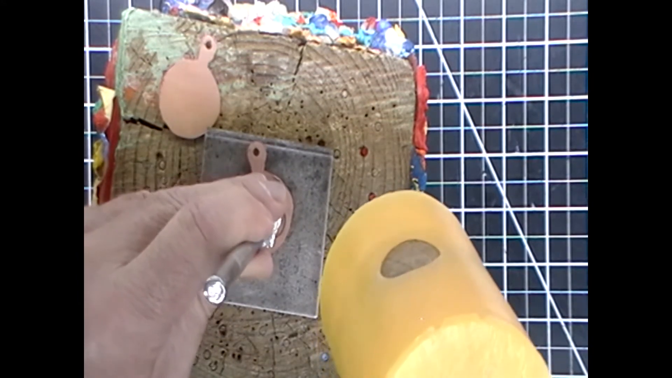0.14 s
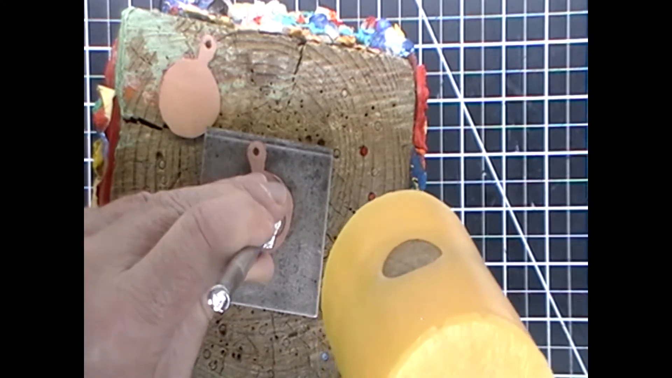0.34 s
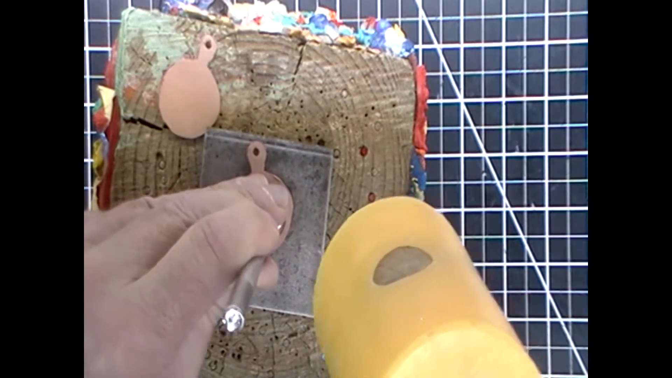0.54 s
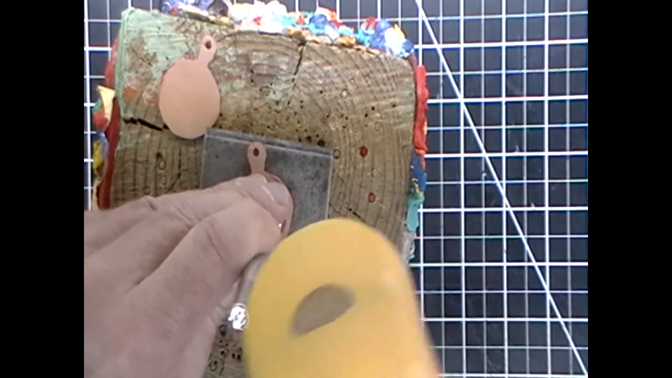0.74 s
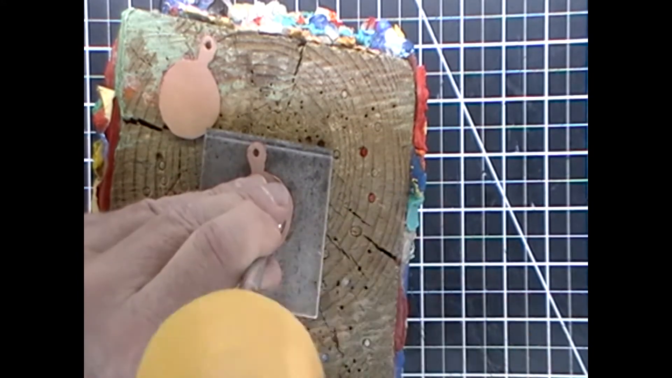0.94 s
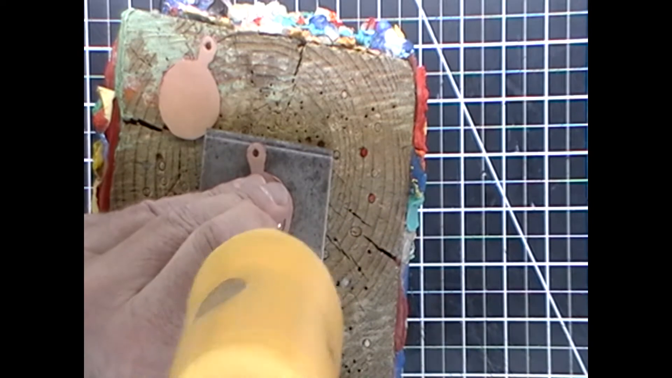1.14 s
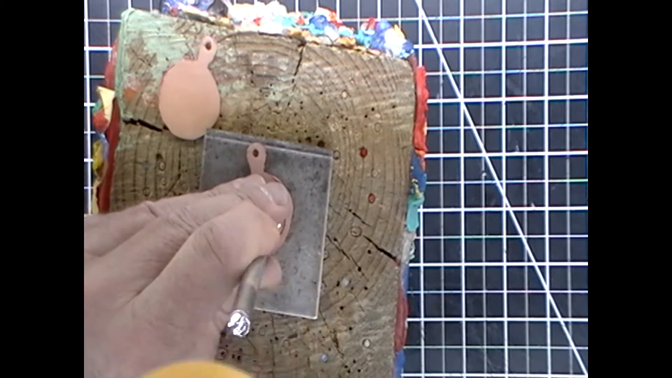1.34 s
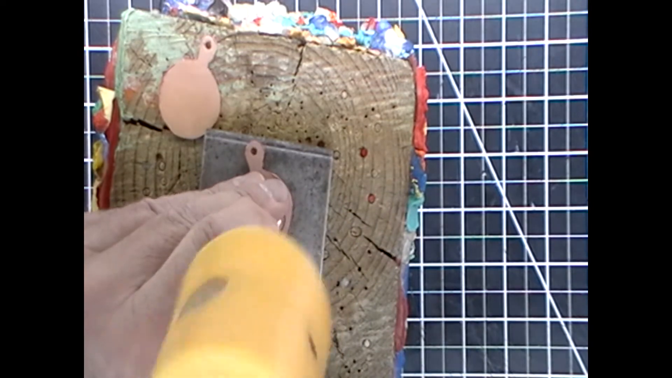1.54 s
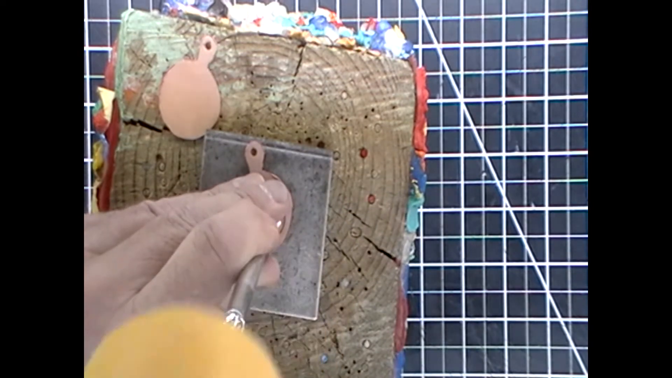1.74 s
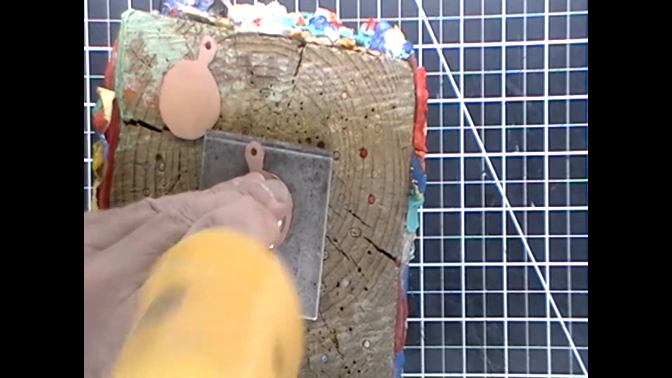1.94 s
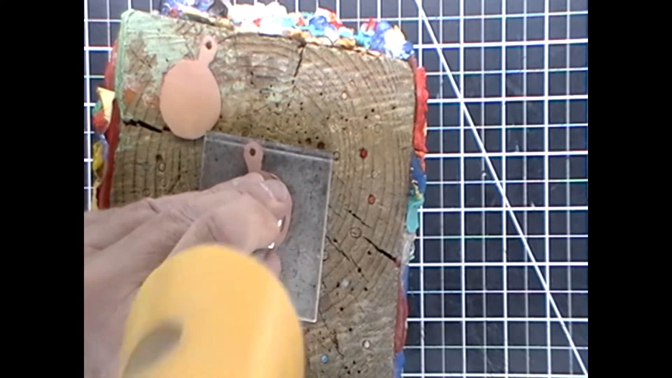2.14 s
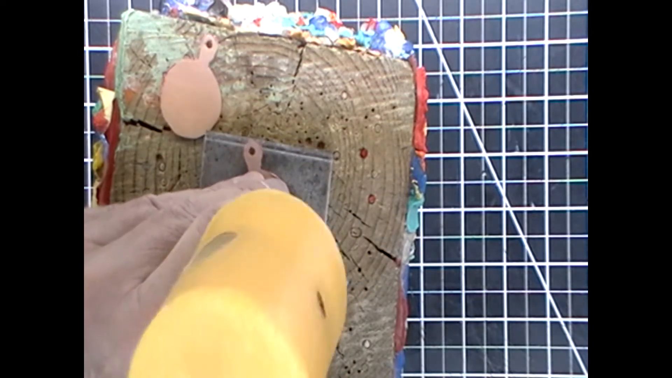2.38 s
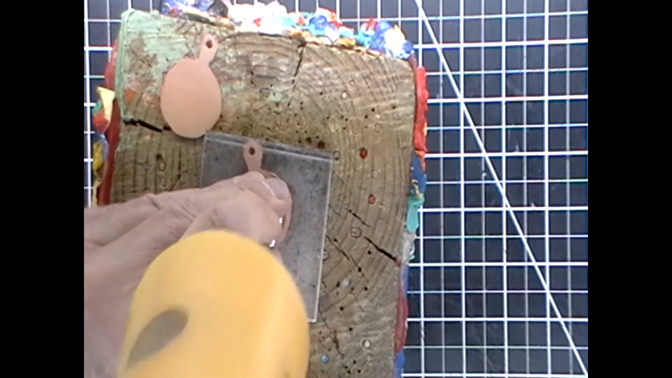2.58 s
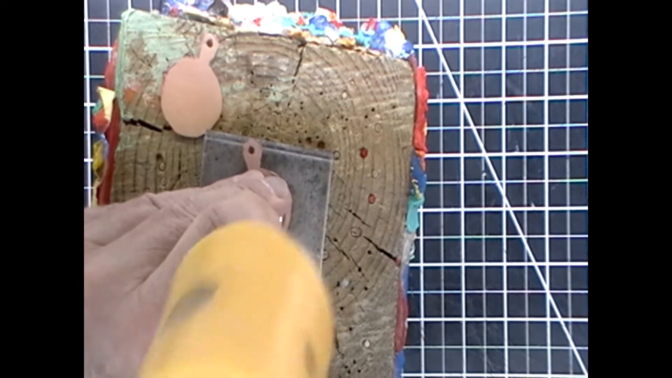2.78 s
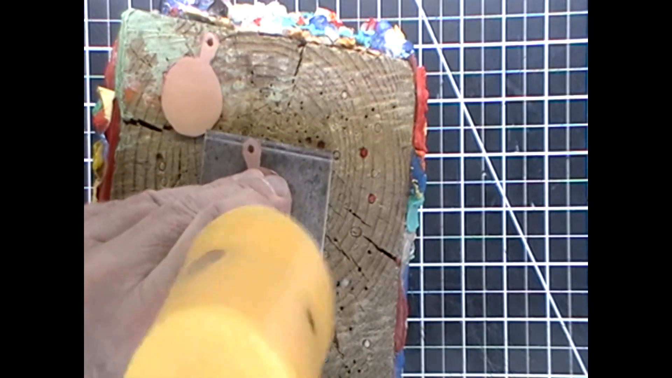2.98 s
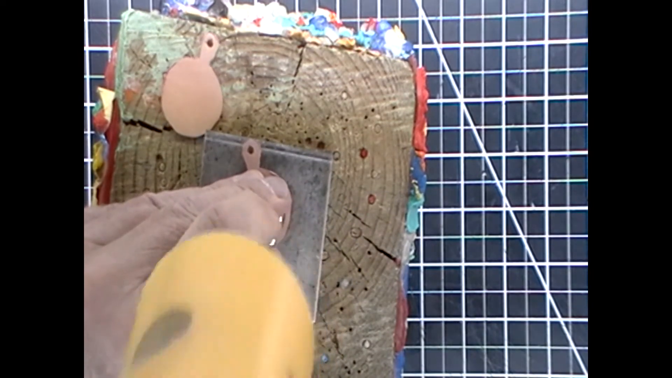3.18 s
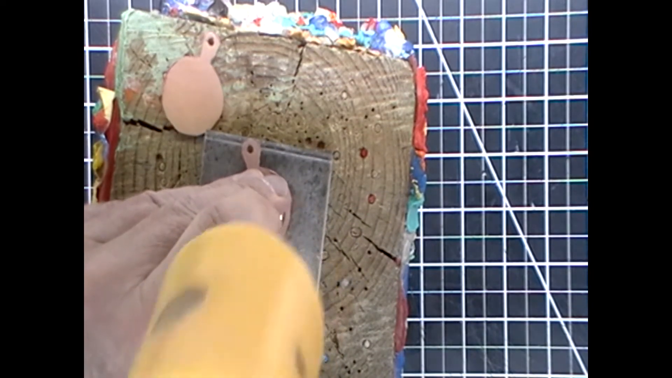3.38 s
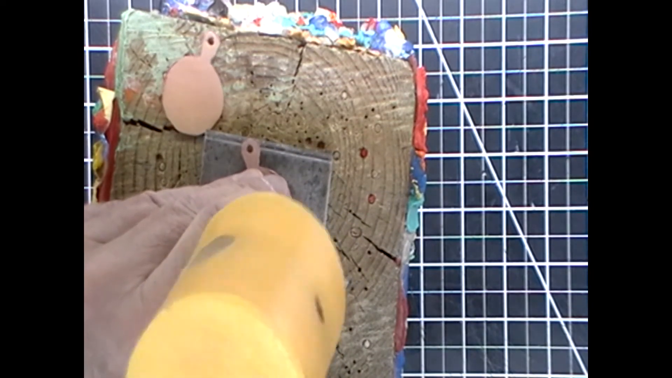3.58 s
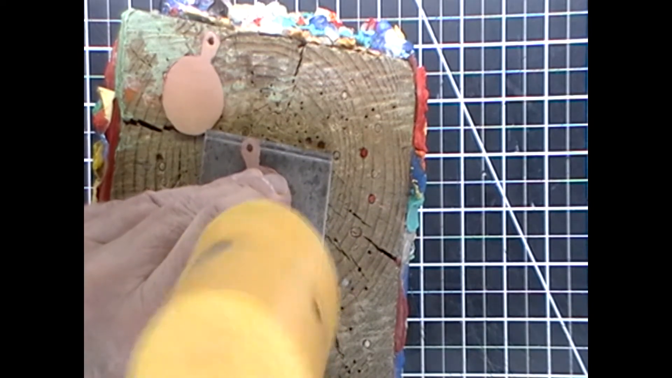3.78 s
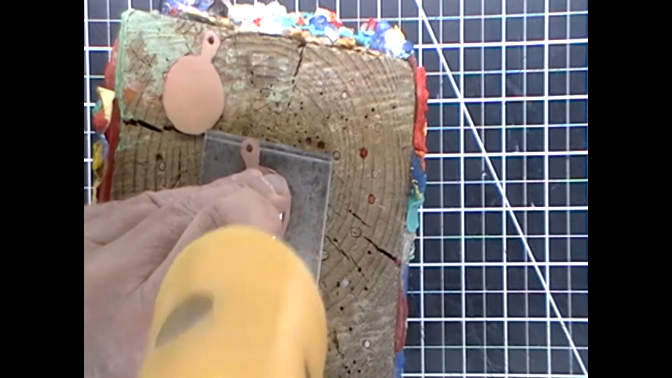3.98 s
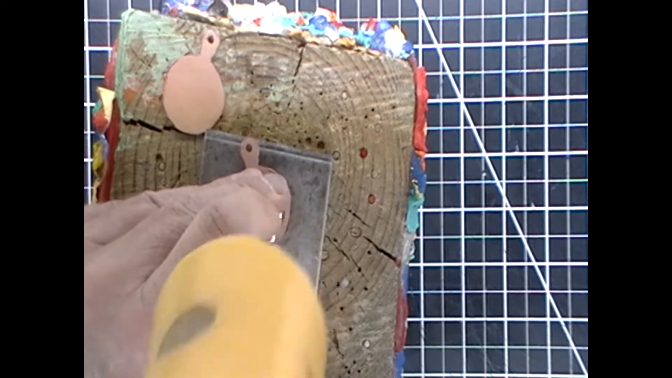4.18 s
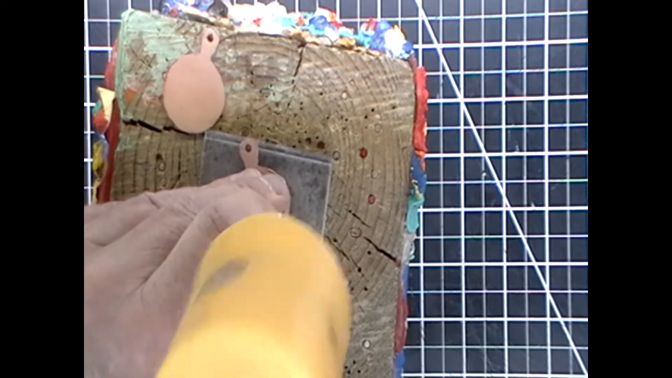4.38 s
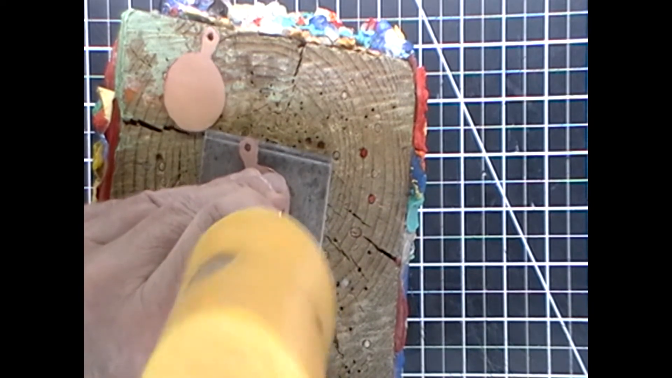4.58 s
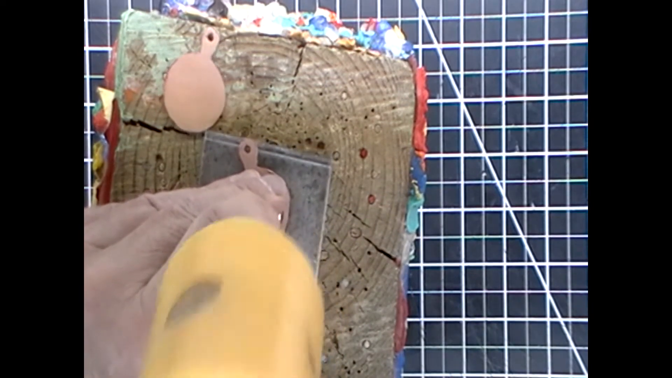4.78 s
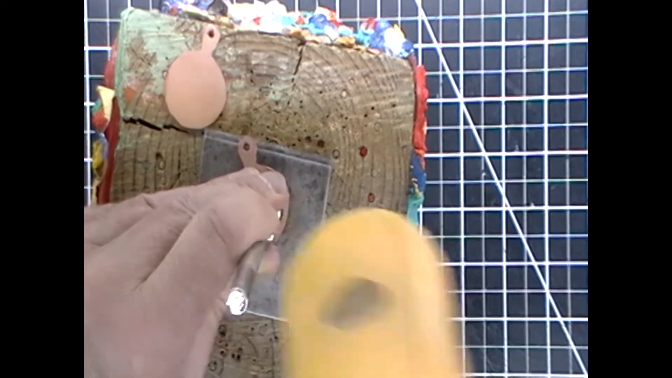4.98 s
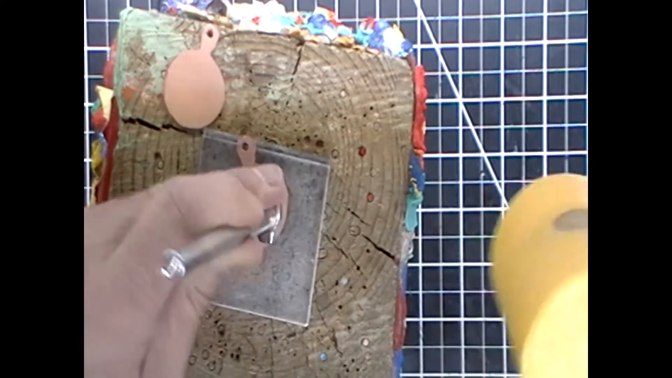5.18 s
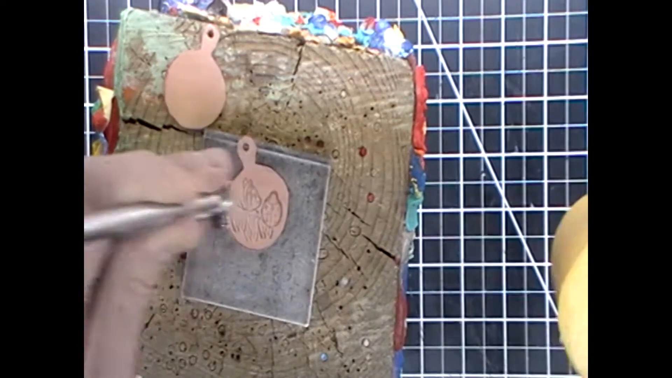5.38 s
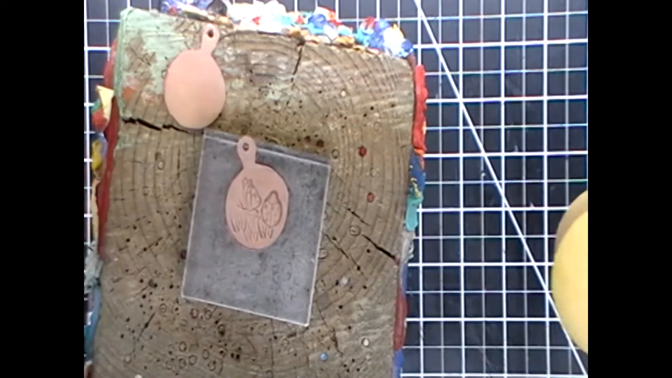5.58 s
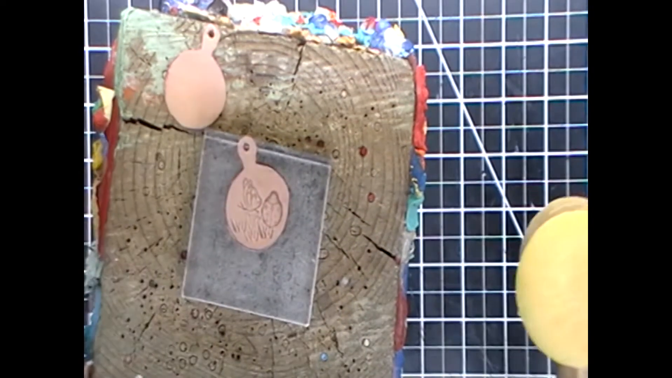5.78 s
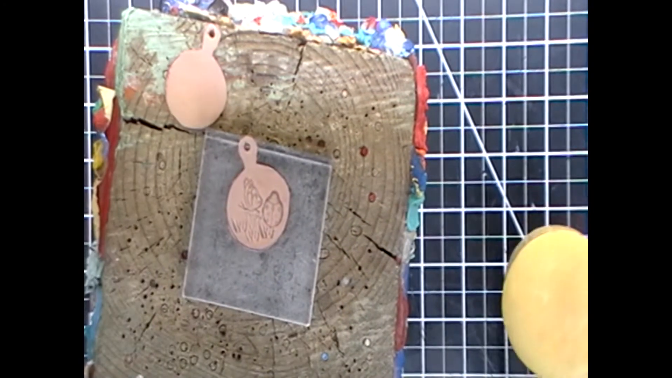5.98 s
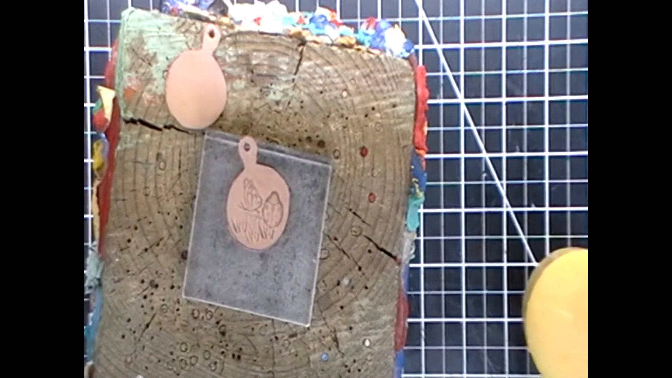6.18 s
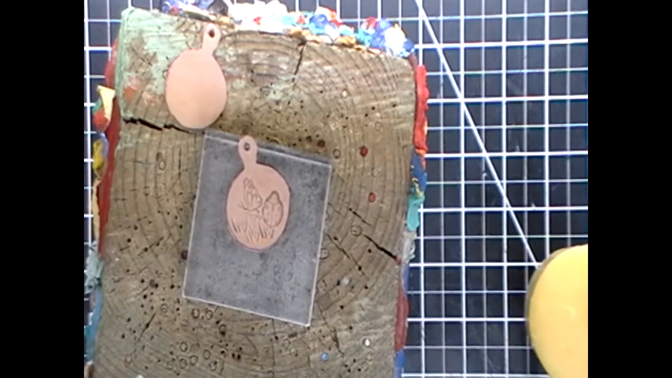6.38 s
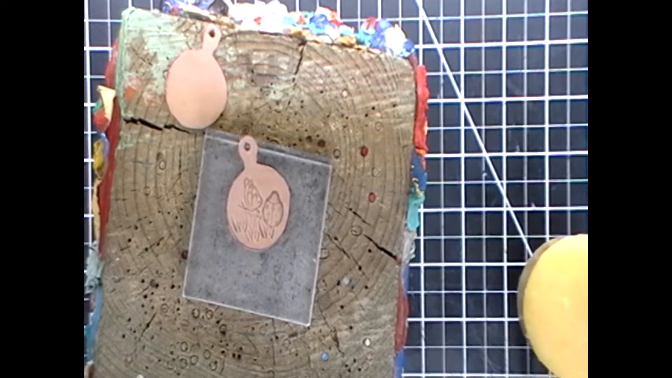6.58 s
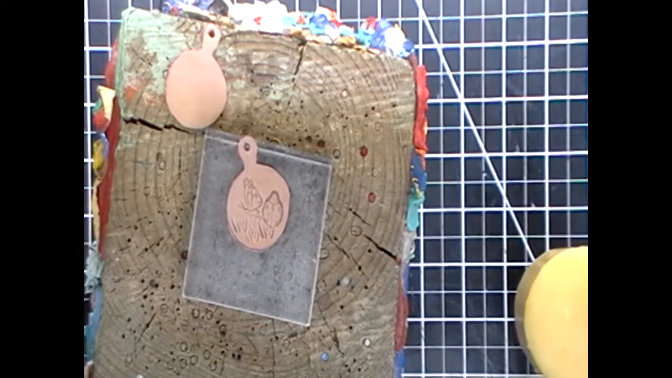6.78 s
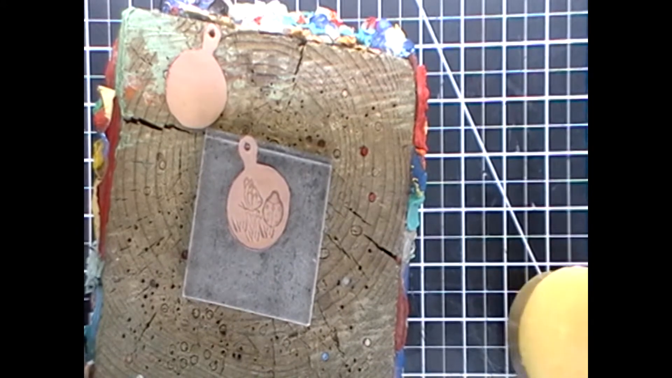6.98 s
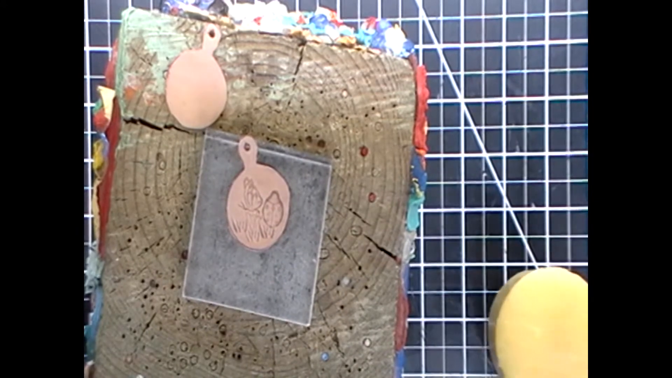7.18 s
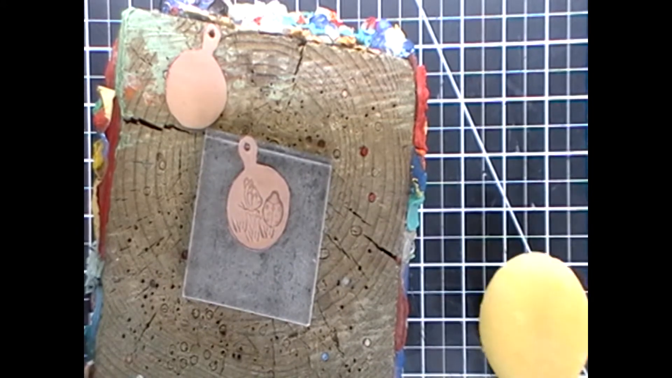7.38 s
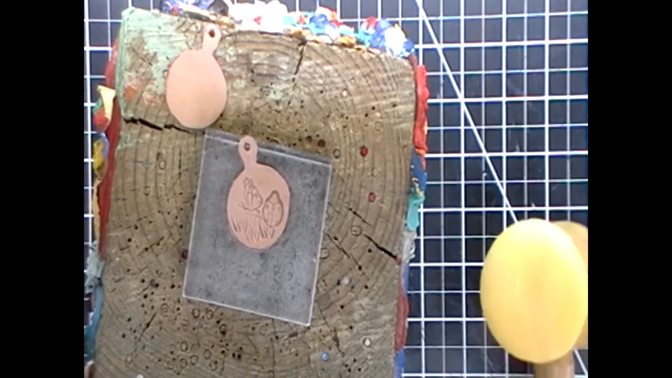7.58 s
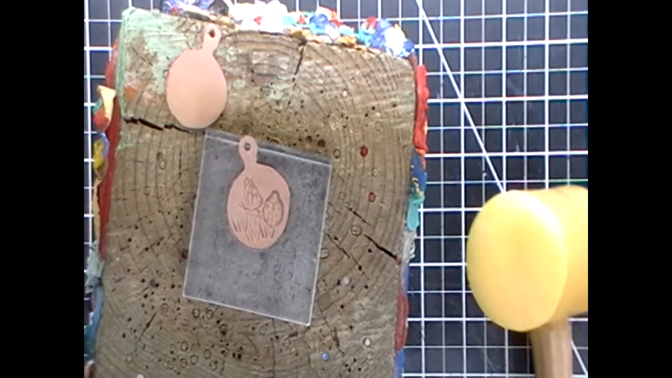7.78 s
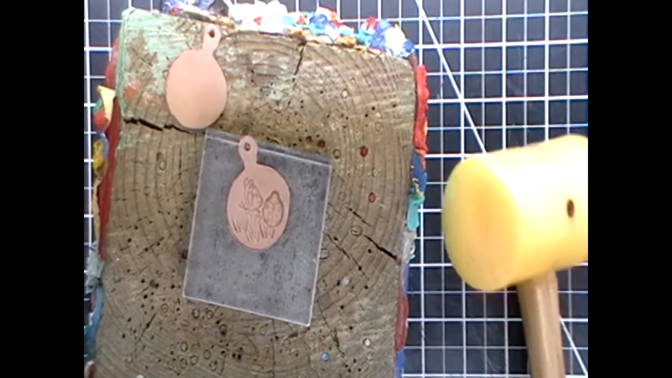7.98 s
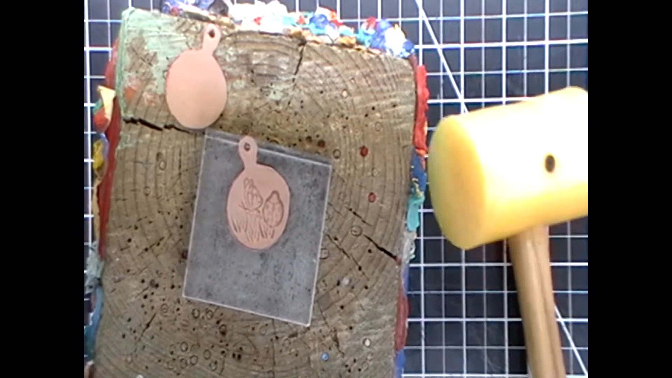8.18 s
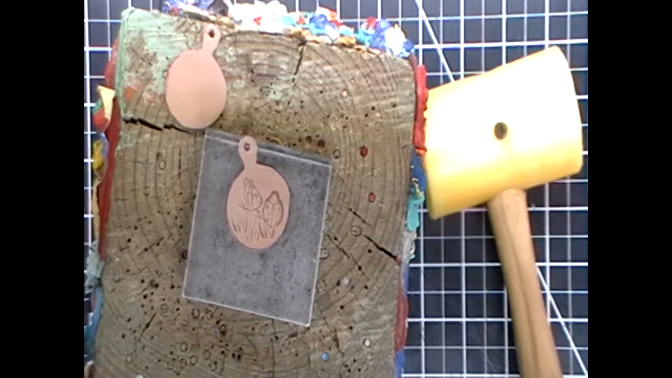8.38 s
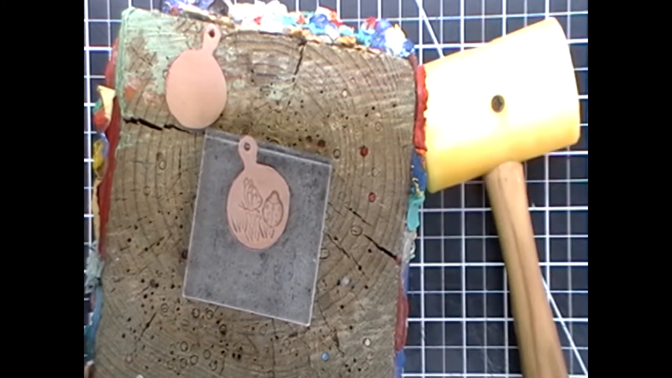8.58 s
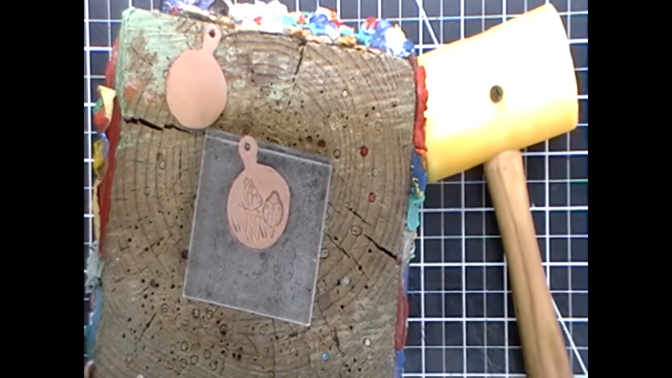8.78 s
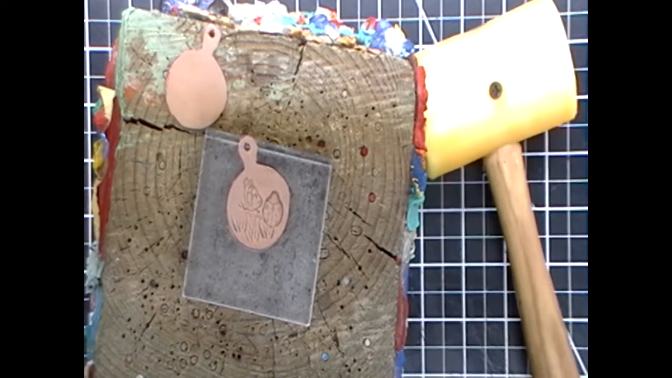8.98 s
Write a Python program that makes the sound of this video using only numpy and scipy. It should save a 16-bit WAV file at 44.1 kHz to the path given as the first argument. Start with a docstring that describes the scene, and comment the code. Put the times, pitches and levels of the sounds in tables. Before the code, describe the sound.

A mallet strikes a steel stamp thirteen times in a small workshop, then tools are set down with light knocks and a clink.

```python
"""In a small workshop, a plastic mallet drives a steel stamp into a copper blank on a steel block.
The block sits on a tree stump on a workbench. Thirteen blows make the parts ring, shake the bench,
echo round the room and overload the close microphone. Then the stamp lifts off with a tick and is
put away with light knocks and rubs, something steel clinks, and the mallet is laid on the bench,
whose top rings on faintly."""
import sys
import numpy as np
from scipy import signal
from scipy.fft import rfft, irfft
from scipy.io import wavfile
from scipy.ndimage import uniform_filter1d

SR = 44100
rng = np.random.default_rng(int(sys.argv[2]) if len(sys.argv) > 2 else 0)


def wrap_up_sound(samples):
    """Save the sound to the file named by the first command line argument, as 16-bit audio."""
    columns = np.atleast_2d(samples).T
    # keep every value between -1 and 1, then stretch to whole-number steps
    tamed = np.clip(columns, -1, 1)
    steps = np.round(tamed * 32767).astype(np.int16)
    wavfile.write(sys.argv[1], SR, steps)


N = 398663
RING_TIME = np.arange(SR * 3 // 4) / SR  # seconds since a hit
FREQS = np.fft.rfftfreq(4096, 1 / SR)  # where filter gains are set [Hz]


def gain_of(db):
    """Turns decibels into a multiplier."""
    return 10 ** (np.asarray(db) / 20)


def curve(points, hz=FREQS):
    """Joins the (frequency, value) points of a table into a curve."""
    point_hz, value = np.transpose(points)
    return np.interp(np.log(hz + 1), np.log(point_hz), value)


def unit_level(x):
    """Scales a sound to an average power of 1."""
    return x / np.sqrt(np.mean(x ** 2) + 1e-20)


def add(mix, start_s, sound):
    """Mixes a sound in at the given time."""
    part = mix[round(start_s * SR):][:len(sound)]
    part += sound[:len(part)]


def colour(x, db):
    """Turns each of FREQS up or down by db, with no sound arriving early."""
    log_gain = np.log(gain_of(np.maximum(db, -100)))
    mirrored = np.concatenate([log_gain, log_gain[-2:0:-1]])
    taps = np.fft.ifft(np.exp(np.conj(signal.hilbert(mirrored)))).real
    return signal.oaconvolve(x, taps)[:len(x)]


def flatten(x, width_hz):
    """Evens out broad peaks and dips in the tone; the fade and fine ripple stay."""
    spectrum = rfft(x, 2 * len(x))
    power = uniform_filter1d(abs(spectrum) ** 2, max(int(width_hz * 2 * len(x) / SR), 1))
    hz = np.linspace(0, SR / 2, len(spectrum))
    return colour(x, np.interp(FREQS, hz, -10 * np.log10(abs(power) + 1e-12)))


def ring(tones, swell=False):
    """A struck object's tones, each dying by 60 dB over its fade time (t60)."""
    out = np.zeros(len(RING_TIME))
    for k, (hz, db, t60) in enumerate(tones):
        damping = np.log(1000) / t60
        sign = -1 if swell and k % 2 else 1  # neighbours cancel at first, so the sound builds up
        envelope = gain_of(db) * 2 * damping / SR * np.exp(-damping * RING_TIME)
        out += sign * envelope * np.sin(2 * np.pi * hz * RING_TIME)
    return out


def burst(tone, t60):
    """A short crackle of contact: fading noise, smoothed and given a tone."""
    spectrum = rfft(rng.standard_normal(len(RING_TIME)) * gain_of(-60 * RING_TIME / t60))
    crackle = irfft(spectrum / np.sqrt(abs(spectrum) + 1e-12), len(RING_TIME)) * (RING_TIME < 2 * t60)
    return colour(crackle / np.linalg.norm(crackle), curve(tone))


# the tone of the quiet room: (frequency [Hz], relative level [dB])
AIR_TONE = [(15, -55), (25, -28.5), (43, -13.5), (120, -0.5), (141, -9), (206, -5), (242, -16.5),
            (317, -11), (394, -15.5), (659, -16), (1260, -18), (1520, -20.5), (16000, -39.5)]
# how much left and right differ: (frequency [Hz], level against the shared noise [dB])
AIR_WIDTH = [(60, -5.5), (150, -2), (380, 3), (950, 2.5), (2380, 0.5), (5980, -1), (15000, -9)]

def room_air():
    """Steady room air, mostly shared in the bass, with each side's own hiss."""
    shared, side = (unit_level(colour(rng.standard_normal(N), curve(AIR_TONE))) for _ in range(2))
    side = colour(side, curve(AIR_WIDTH))
    return gain_of(-60) * np.array([shared + side, shared - side])


# how much the echoes differ between the sides: (frequency [Hz], level [dB])
ECHO_WIDTH = [(60, -13), (300, -13.5), (700, -14), (1600, -11), (5000, -11), (14000, -5)]
# the lean to the right: (frequency [Hz], left minus right [dB])
BALANCE = [(60, -.4), (250, -1.6), (550, -3), (1200, -1.7), (2500, -.9), (12000, -.5)]

def stereo(shared, side):
    """The microphone's two sides hear slightly unlike echoes, the right a little louder."""
    side = colour(side, curve(ECHO_WIDTH))
    lean_db = curve(BALANCE) / 2
    return np.array([colour(shared + side, lean_db), colour(shared - side, -lean_db)])


def echoes(fade_times, delay_s, rise_s):
    """Dense echoes build up after a delay; each frequency dies at its own speed."""
    hz, t, noise = signal.stft(rng.standard_normal(len(RING_TIME)), SR, nperseg=256)
    fade = gain_of(-60 * t / curve(fade_times, hz)[:, None])
    tail = signal.istft(noise * fade, SR, nperseg=256)[1][:len(RING_TIME)]
    return flatten(tail * np.clip((RING_TIME - delay_s) / rise_s, 0, 1), width_hz=120)


# standing waves, the notes of the room and its furniture: (pitch [Hz], level [dB], fade time [s])
ROOM_TONES = [(256, 7, .28), (377, 0, .27), (447, 2, .27), (560, -2, .22), (608, -11, .3), (674, -8, .22),
              (757, -8, .2), (797, -12, .2), (883, -10, .18), (977, -6, .18), (1066, -4, .2),
              (1663, -4, .17), (2528, -6, .15), (2637, -6, .15)]
# the tone of the wall echoes: (frequency [Hz], level [dB])
WALL_TONE = [(60, -12.5), (200, -8), (400, -15), (700, -13.5), (1400, -13.5), (2900, -13), (5000, -14.5),
             (9000, -24.5), (16000, -24.5)]
# how long they last: (frequency [Hz], fade time [s])
WALL_FADE = [(100, 0.29), (500, 0.23), (1500, 0.18), (4000, 0.15), (8000, 0.16), (16000, 0.12)]

def room():
    """Two paths to the microphone: direct with quick echoes off the bench, and by way of the walls."""
    near, near_side = (echoes([(1000, .027)], delay_s=.001, rise_s=.003) for _ in range(2))
    far, far_side = (colour(echoes(WALL_FADE, delay_s=.008, rise_s=.018), curve(WALL_TONE))
                     for _ in range(2))
    direct = flatten(signal.unit_impulse(len(RING_TIME)) + gain_of(-6) * near, width_hz=150)
    walls = far + ring(ROOM_TONES, swell=True)
    return stereo(direct, gain_of(-8) * near_side), stereo(walls, far_side)


# three short rubs, then the bench top's faint lingering ring after the mallet is laid down:
# (start [s], length [s], level [dB])
SWELLS = [(7.441, 0.28, -50.5), (7.823, 0.06, -50), (7.896, 0.19, -57), (8.394, 0.69, -64)]
# the tone they share: (frequency [Hz], relative level [dB])
SWELL_TONE = [(60, -10), (400, 2.5), (650, 11.5), (1000, -4), (2200, -6.5), (4500, -12.5), (7000, -21.5),
              (15000, -37)]

def rubs_and_lingering_ring():
    """Grainy noise swells and fades, for rubs on the bench and then for its top ringing on."""
    ends_db, grains_per_s = -17, 3000
    envelope = np.zeros(N)
    for start_s, length_s, db in SWELLS:
        add(envelope, start_s, gain_of(db + ends_db * np.linspace(-1, 1, round(length_s * SR)) ** 2))
    grains = rng.standard_normal(N) * gain_of(2 * rng.exponential(1, N).clip(0, 5))
    grains *= rng.random(N) < grains_per_s / SR
    return unit_level(colour(grains, curve(SWELL_TONE))) * envelope


# the tone of the juddering handle: (frequency [Hz], relative level [dB])
JUDDER_TONE = [(40, -38.5), (85, 3.5), (170, 10.5), (260, 4), (400, -13.5), (1000, -28), (4000, -30.5),
               (16000, -65)]

def judder():
    """The dragged handle sticks and slips in a short run of pulses, slows and lets go."""
    start_hz, slowing_hz_per_s = 88.6, 138
    hold_s, fade_db_per_s = .063, 420
    rate_hz = np.maximum(start_hz - slowing_hz_per_s * RING_TIME, start_hz / 2)
    slips = np.diff(np.floor(np.cumsum(rate_hz) / SR), prepend=-1)
    level_db = -41.5 - fade_db_per_s * np.maximum(RING_TIME - hold_s, 0)
    return unit_level(colour(slips, curve(JUDDER_TONE))) * gain_of(level_db)


# the tone of the tick: (frequency [Hz], level [dB])
TICK_TONE = [(300, -37.5), (1500, -23), (4000, -15.5), (9000, -6.5), (16000, -19)]

def stamp_tick():
    """The stamp ticks as it leaves the copper."""
    return burst(TICK_TONE, t60=.01)


# the notes of a small steel tool: (pitch [Hz], relative level [dB], fade time [s])
STEEL_TONES = [(2792, 7.5, 0.16), (4899, 1, 0.12), (4980, 1, 0.087), (7328, 20.5, .17), (9240, 6, .11),
               (9230, 10.5, 0.11), (9600, 8.5, 0.09), (13870, -16, .16), (14700, 6, 0.11)]
# its chatter: (frequency [Hz], relative level [dB])
CHATTER_TONE = [(100, -10), (600, -4), (1500, 2.5), (3000, -6.5), (6000, -5), (9500, -4), (12000, -23),
                (16000, -11)]

def steel_clink():
    """A loose steel tool rings and chatters."""
    return gain_of(10) * ring(STEEL_TONES) + gain_of(-4.5) * burst(CHATTER_TONE, t60=.27)


# the deep notes of the bench: (pitch [Hz], relative level [dB], fade time [s])
BENCH_TONES = [(57, 37, .65), (67.5, 30.5, 0.94), (79, 35, 0.49), (90, 36.5, 0.38), (114, 38, 0.42),
               (130.7, 32.5, .25), (146.3, 31, 0.39), (176.4, 27, 0.87), (235, 19, 0.58)]

def bench_thump():
    """A push sets the bench rocking under the stump."""
    return ring(BENCH_TONES, swell=True)


# things set down: (time [s], relative level [dB], treble limit [Hz], the tool's own pitch [Hz])
LANDINGS = [(6.1568, -24.5, 2925, 2066), (6.3253, -22, 2500, 4410), (6.4358, -36, 1467, 1740),
            (6.7965, -35, 1303, 2190), (6.815, -35.5, 900, 1350), (7.7479, -38.5, 1920, 1600),
            (8.075, -31.5, 1505, 620), (8.394, -1.5, 1524, 787), (8.4452, -36.5, 4850, 2560)]
# the notes of the bench top: (pitch [Hz], relative level [dB], fade time [s])
TOP_TONES = [(134, 39.5, .12), (250.2, 37.5, 0.11), (380, 35.5, 0.2), (476, 35.5, 0.073), (615, 42.5, 0.33),
             (743, 31, 0.075), (1085, 28, 0.25), (1287, 31, 0.028), (1560, 30.5, 0.071), (1900, 28, 0.019),
             (2505, 28.5, 0.062), (4630, 27, 0.0066)]
# the tap of contact: (frequency [Hz], relative level [dB])
TAP_TONE = [(40, 2), (200, 31), (1500, 24), (4000, 23.5), (8000, 21.5), (16000, 11)]
# the top's many weaker notes, blurred into noise: (frequency [Hz], relative level [dB])
BOARD_TONE = [(100, 19.5), (400, 25), (1400, 24.5), (2200, 10.5), (5000, 9), (16000, -8)]

def tool_knocks():
    """Tools land on the bench and set its top ringing."""
    out, top = np.zeros(N), ring(TOP_TONES, swell=True)
    thump = gain_of(-23) * bench_thump()
    for time_s, db, treble_hz, own_hz in LANDINGS:
        treble_loss = 1 + (FREQS / treble_hz) ** 3.55  # soft contact takes away treble
        bass_loss = 1 + (235 / (FREQS + 1)) ** 4  # light tools move little bass
        wood = top + burst(TAP_TONE, t60=.0093) + burst(BOARD_TONE, t60=.25)
        knock = colour(wood, -10 * np.log10(treble_loss * bass_loss))
        own_db = 31.5 - 2 * np.log2(own_hz / 1000)  # a higher ring is weaker
        add(out, time_s, gain_of(db) * (knock + ring([(own_hz, own_db, .018)]) + thump))
    return out


# blows and two bounces: (time [s], force against a full swing [dB], pitch [factor], glancing [0-1])
MALLET_HITS = [(1.1337, -2.5, 1.077, .85), (1.5725, 0.9, 1.007, 0.25), (2.0232, 1, 1.026, 0.14),
               (2.379, -1.53, 1.06, 0.1), (2.7055, 0.5, 1.074, 0.14), (3.0138, 0.1, 1.02, 0.11),
               (3.2992, -1, 1.02, 0.02), (3.573, 0, 1.05, 0.13), (3.8375, -1.2, 1.053, .05),
               (4.0944, -1, 1.05, 0.08), (4.3444, 1, 1.02, .08), (4.6073, 1.04, 1.06, 0.08),
               (4.649, -13.5, 1.15, 0.26), (4.8753, .7, 1, 0.15), (4.911, -11, 1.14, 0.37)]
# mallet, stamp and block ringing together:
# (base pitch [Hz], level hit squarely [dB], level hit at a glance [dB], fade time [s])
STAMP_TONES = [(378.2, 17, 10.5, 0.011), (623, 39, 19, 0.02), (779.6, 43, 22, 0.0097), (1290, 35, 35, .012),
               (1610, 34.5, 44.5, 0.018), (2148, 31, 30, 0.016), (2490, 33, 17, 0.015),
               (2963, 32, 22, 0.0071), (3700, 22.5, 13.5, 0.0028), (4185, 26, 13, 0.012),
               (6010, 17, 26.5, 0.016), (7140, 7, 6, 0.021), (9300, 7, 0, .006)]
# the crack of contact: (frequency [Hz], relative level [dB])
CRACK_TONE = [(40, 2), (200, 21), (1000, 30.5), (2800, 27.5), (5000, 19.5), (8000, 8.5), (11000, 0),
              (16000, -11.5)]

def mallet_blows():
    """Each blow rings the tightly held parts, and the stump passes the push on to the bench."""
    blows, crack, thump = [], burst(CRACK_TONE, t60=.0063), bench_thump()
    octaves = np.log2(np.clip(FREQS, 300, 8000) / 1000)
    for time_s, force_db, pitch, glance in MALLET_HITS:
        # no two blows land quite alike
        tones = [(hz * pitch, square_db + glance * (glance_db - square_db) + rng.standard_normal(), t60)
                 for hz, square_db, glance_db, t60 in STAMP_TONES]
        contact = crack + .35 * burst(CRACK_TONE, t60=.012)
        strike = ring(tones) + gain_of(-8 * glance) * contact
        tilt_db_per_octave = .58 + .37 * force_db  # a harder blow is shorter, so brighter
        strike = colour(strike, -6 + force_db + tilt_db_per_octave * octaves)
        # the thump grows with force until the stump bottoms out; a glancing blow pushes less
        thump_db = .23 + 1.8 * min(force_db, 0) - 6 * glance
        blows.append((time_s, strike + gain_of(thump_db) * thump))
    return blows


def scene():
    """Every sound reaches the close microphone through the room, over the steady air."""
    direct, walls = room()
    out = room_air()
    for time_s, blow in mallet_blows():
        _, walls_now = room()  # the moving arm changes the wall echoes from blow to blow
        for channel, path in zip(out, direct + walls_now):
            add(channel, time_s, signal.fftconvolve(blow, path))
    knocks = tool_knocks()
    small_sounds = rubs_and_lingering_ring()
    for time_s, sound in [(5.3554, stamp_tick()), (7.748, judder()), (8.0607, steel_clink())]:
        add(small_sounds, time_s, sound)
    for sound, walls_db in [(knocks, 2), (small_sounds, 0)]:  # knocks are further off, so echo more
        out += signal.oaconvolve(sound[None], direct + gain_of(walls_db) * walls, axes=1)[:, :N]
    return out


def record(dry):
    """The overloaded input flattens each blow's first peaks; deep bass and top treble are then cut."""
    ceiling, bass_cut_hz, treble_cut_hz = .8, 48, 16300
    drive = signal.resample_poly(dry, 2, 1, axis=1) / ceiling  # double rate keeps false tones down
    squashed = ceiling * drive / (1 + drive ** 6) ** (1 / 6)
    clipped = signal.resample_poly(squashed, 1, 2, axis=1)
    bass_cut = signal.butter(4, bass_cut_hz, "highpass", fs=SR, output="sos")
    treble_cut = signal.firwin(255, treble_cut_hz, window=("kaiser", 9), fs=SR)
    return signal.oaconvolve(signal.sosfilt(bass_cut, clipped), treble_cut[None], "same")


dry = scene()
out = record(dry)
wrap_up_sound(out)
```